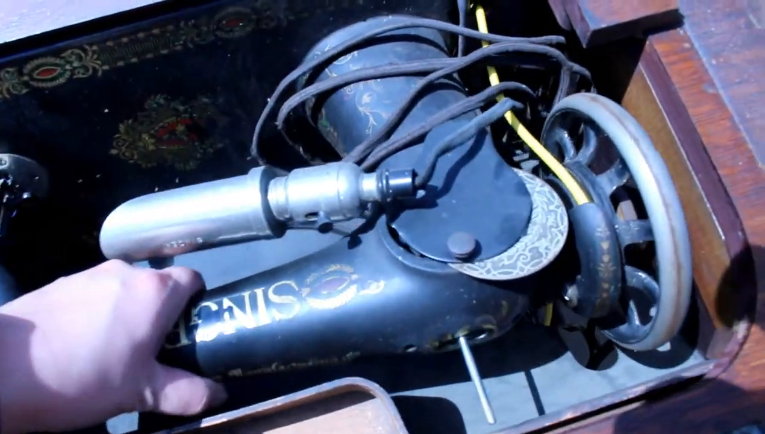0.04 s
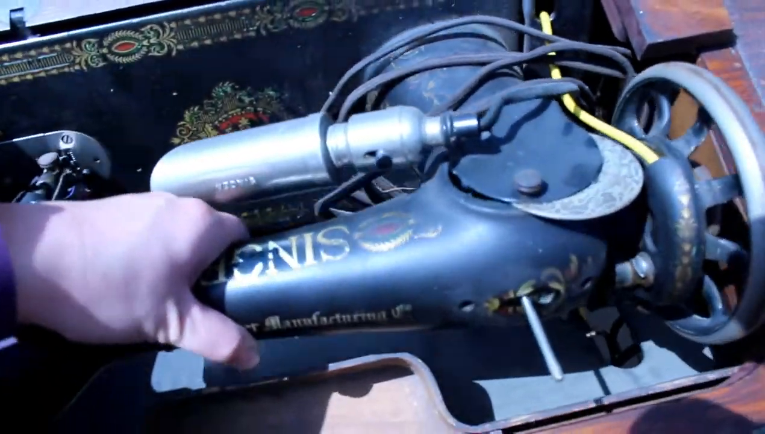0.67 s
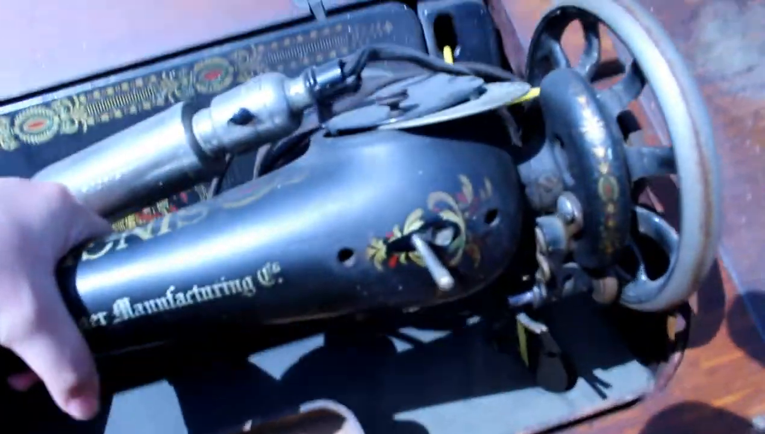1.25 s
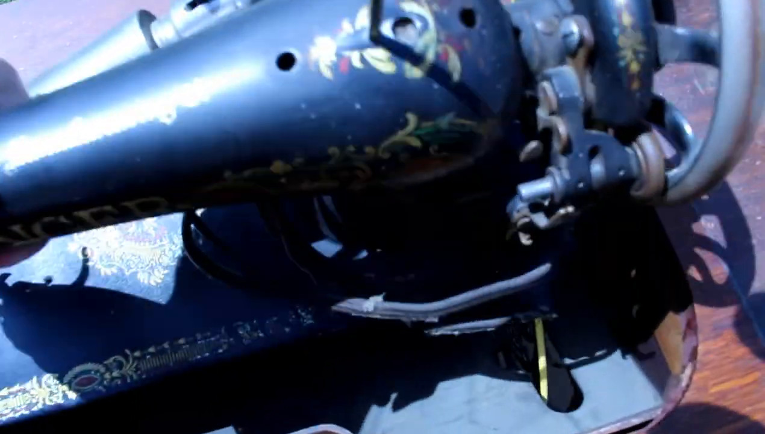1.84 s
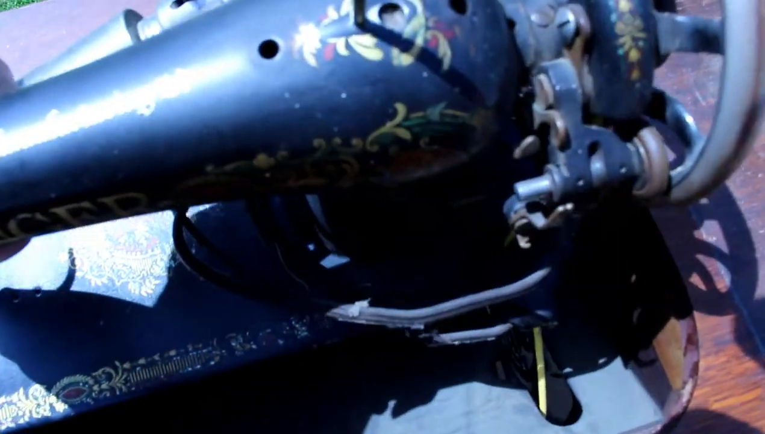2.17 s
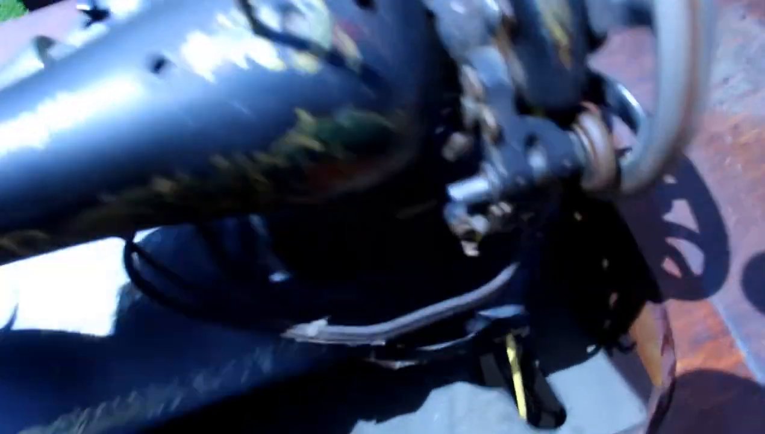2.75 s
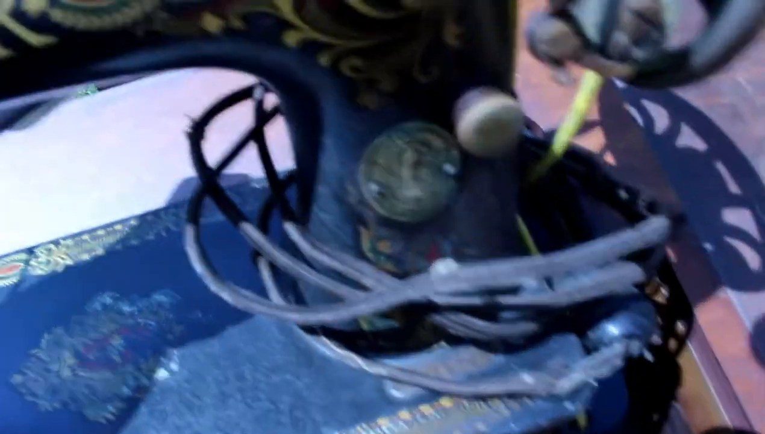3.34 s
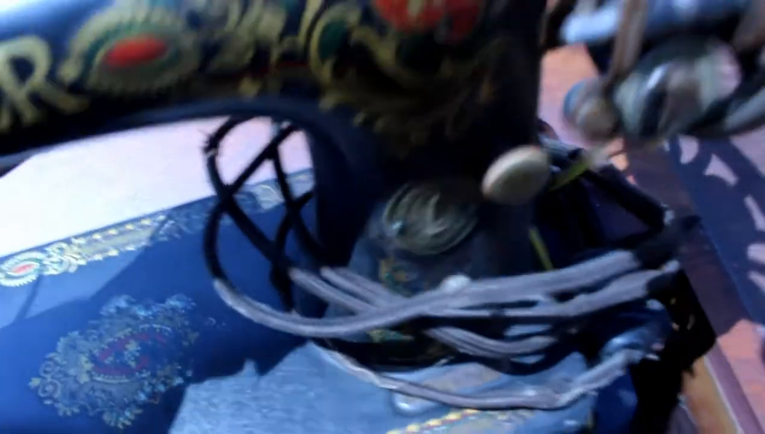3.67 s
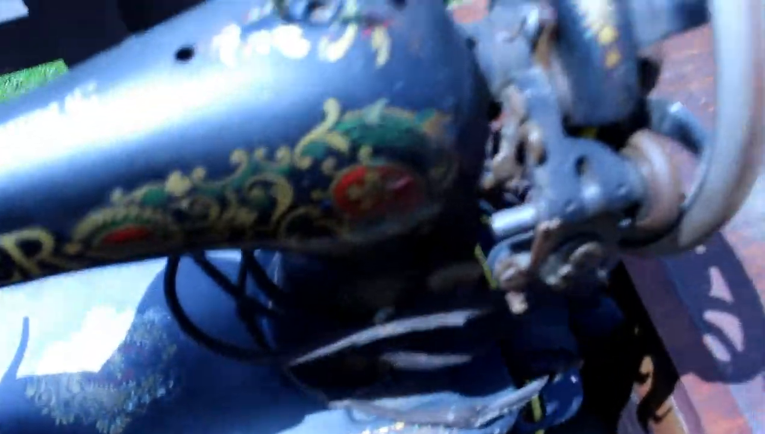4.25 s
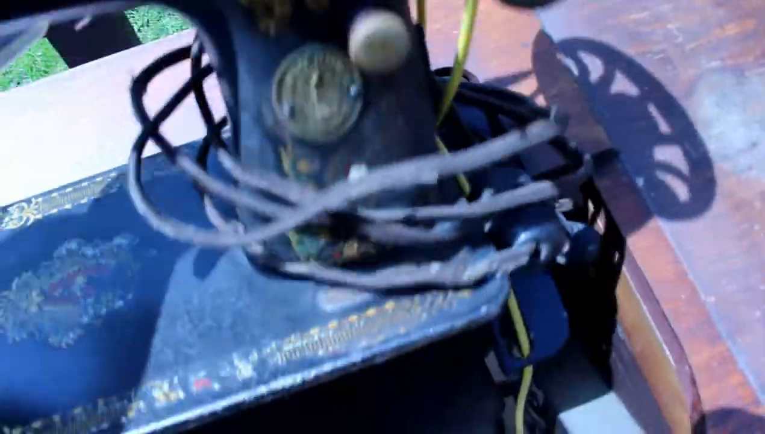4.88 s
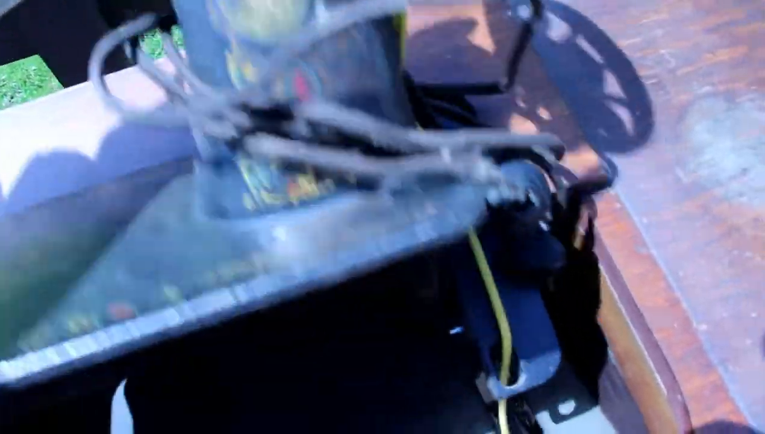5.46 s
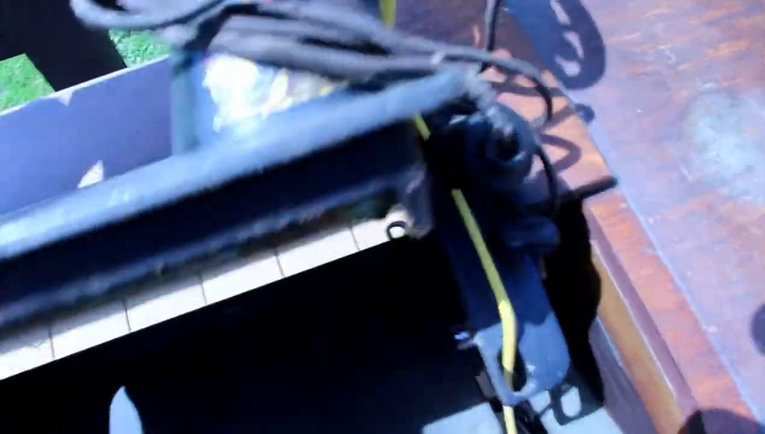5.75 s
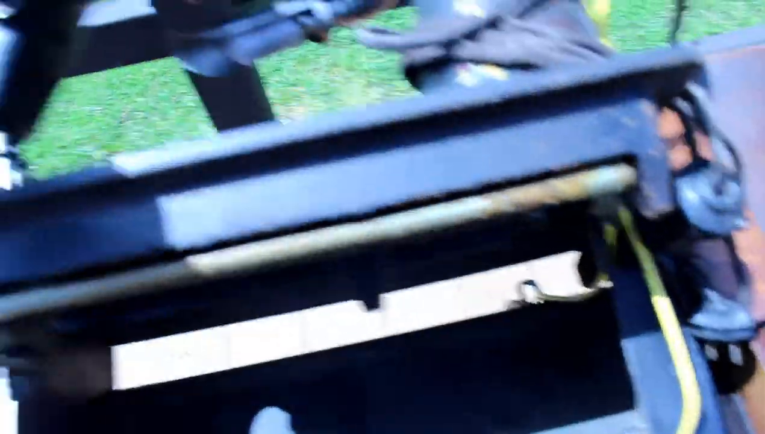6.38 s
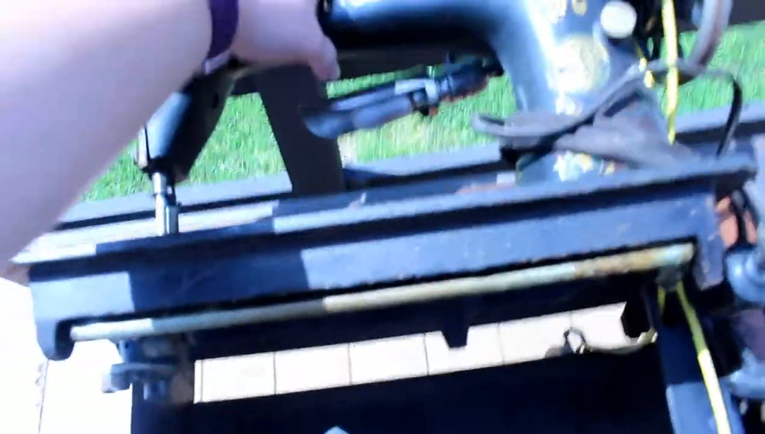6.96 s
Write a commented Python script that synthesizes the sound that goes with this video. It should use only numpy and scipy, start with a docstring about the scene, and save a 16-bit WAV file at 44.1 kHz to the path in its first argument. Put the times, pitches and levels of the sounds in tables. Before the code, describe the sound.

A heavy sewing machine head grinds and knocks against its wooden cabinet while birds chirp in a light breeze.

```python
"""Grinding, wooden knocks and small steel ticks sound close by in a garden, with a rustling sleeve,
as a cast-iron sewing machine head is swung up out of its cabinet. Stick-slip friction makes the grinding;
impacts excite the damped modes of wood and metal. One songbird repeats a few gliding syllables nearby
and others call far off, while wind eddies nudge the microphone over a low distant drone
and a far engine gathering speed."""
import sys
import numpy as np
from scipy import signal
from scipy.io import wavfile
from scipy.ndimage import uniform_filter1d

SR = 44100
rng = np.random.default_rng(int(sys.argv[2]) if len(sys.argv) > 2 else 0)


def store_pcm(level_fs):
    """Save levels as 16-bit WAV."""
    pcm = np.round(np.clip(level_fs, -1, 1) * 32767).astype(np.int16)
    wavfile.write(sys.argv[1], SR, np.atleast_2d(pcm).T)


N = 309141

# modes of the hollow cabinet: frequency_hz, level_db, t60_s
BOX_MODES = [(234.3, -16.5, 0.88), (295.7, -11.5, 0.29), (335.7, -12.5, 0.38), (366, -9.5, 0.093),
             (464, -2, 0.19), (557.7, 1, 0.17), (634, 10, 0.073), (668.1, 8.5, 0.075)]
# syllable contours that the song table draws on: offset_s, pitch_hz, level_db
THIN_WHISTLE = [(0, 9100, 2), (.04, 8680, 1)]
HIGH_WHISTLE = [(0, 6630, -0.5), (.05, 6590, 3.5)]
LOW_WHISTLE = [(0, 5000, -9.5), (0.024, 4650, 2.5), (0.065, 4500, -1.5)]
ARCH = [(0, 5360, -6), (.016, 6400, -1.5), (.032, 6030, 5.5), (.046, 4400, -9), (.056, 3430, -2)]
CHIP = [(0, 4450, -1), (0.013, 6530, 0)]
SQUEAK = [(0, 7250, -3), (.032, 7800, 1)]
SLUR = [(0, 5900, -4), (.015, 6920, -12.5), (.027, 5420, -6), (.048, 5405, 1), (.065, 4700, 2.5),
        (.083, 3380, -7)]
DIP = [(0, 7700, -12), (0.021, 6140, 2.5), (0.041, 5800, 4.5), (.068, 6660, -6)]
LOW_RISE = [(0, 3570, 2), (.025, 3970, 1.5), (.06, 3950, 0)]
HOOK = [(0, 5300, -4), (.02, 5900, -0.5), (0.053, 4950, -4.5)]
SWOOP = [(0, 4220, -7), (.04, 4950, 5), (.072, 6380, -3), (.095, 4610, -4), (.135, 3850, -1),
         (.175, 3500, -6)]
FALL = [(0, 6800, -5), (.018, 5180, 4), (.042, 4820, -3), (.056, 4600, -17), (.072, 4000, -2),
        (0.101, 3590, -9)]


def knocks():
    """Impact excitation: the brighter a blow, the more it drives the iron and the less the box."""
    # head on cabinet, bare iron bright, a flat face dull: start_s, level_db, brightness_db_per_octave
    blows = [(0.046, -32, 1), (0.087, -35.5, -3), (0.812, -61, 21), (1.194, -36, -2), (1.277, -38, 7.5),
             (2.2515, -20, 0.5), (2.2635, -25, 12.5), (2.268, -9.5, 8), (2.2705, -12, -1),
             (2.317, -28.5, 1), (2.6425, -40.5, -2.5), (2.7225, -26.5, 3.5), (2.735, -34, 7),
             (2.745, -33.5, -10), (2.787, -33.5, 4), (3.029, -24, 4), (3.149, -33, -5.5),
             (3.302, -45, -2.5), (3.69, -44, -4), (3.734, -36.5, -3.5), (3.759, -39, -4),
             (3.915, -30, -0.5), (3.9305, -25, 1.5), (3.945, -30.5, -3.5), (3.9745, -28, -0.5),
             (4.008, -32.5, -5.5), (4.032, -36.5, -10), (4.888, -41, 0), (4.928, -39.5, -3.5),
             (5.065, -39, 0), (5.174, -37.5, 2.5), (5.225, -36, -0.5), (5.259, -39.5, 2.5),
             (5.307, -34, -3.5), (5.319, -35, -6), (5.395, -34, 1), (5.427, -44.5, -8.5)]
    # the hinges judder and bump the box: start_s, level_db
    bumps = [(0.334, -38), (0.432, -36.5), (0.496, -39.5)]
    # modes of the thin panels: frequency_hz, level_db, t60_s
    panel_modes = [(777, -5, 0.2), (861, 5, 0.085), (963, 1.5, 0.093), (1080, 2.5, 0.052), (1113, 6, 0.095),
                   (1204, -3, 0.03), (1260, -4, 0.06), (1324, -0.5, 0.07), (1558, -5, .05),
                   (1610, -2, 0.04)]
    # modes of the casting: frequency_hz, level_db, t60_s
    iron_modes = [(1750, -1, 0.07), (1966, -5, 0.077), (2286, 8, 0.02), (2386, 4, 0.053), (2537, 0, 0.03),
                  (2800, -19, .04), (3350, -10, 0.018), (4030, -10.5, 0.046), (4960, -30, .03)]
    box_share_db, iron_share_db = -1, -11
    box_octaves, iron_octaves = -.8, 1.3  # distance in pitch from the panels
    panel_limit_db = -20.5  # the panels give way under a heavy blow and get no louder
    out = np.zeros((2, N))
    for s, db, brightness in blows:
        add(out, s, from_db(db + box_share_db + brightness * box_octaves) * box_blow())
        panels = strike(panel_modes, crack_db=2, crack_t60=0.041, tail_db=-10.5, tail_t60=0.22,
                        alike=0.86)
        add(out, s, from_db(min(db, panel_limit_db)) * panels)
        iron = strike(iron_modes, crack_db=4.5, crack_t60=0.041, tail_db=-28.5, tail_t60=0.41,
                      alike=0.72)
        add(out, s, from_db(db + iron_share_db + brightness * iron_octaves) * iron)
    for s, db in bumps:
        add(out, s, from_db(db) * box_blow())
    return out


def box_blow():
    """Impulse response: the hollow cabinet rings after one blow."""
    return strike(BOX_MODES, crack_db=0, crack_t60=0.02, tail_db=-15.5, tail_t60=0.22, alike=0.87)


def ticks():
    """Free vibration: light steel parts touch and ring briefly in high modes."""
    # contacts: start_s, level_db
    touches = [(0.114, -52), (2.268, -24), (2.33, -52), (2.7354, -31.5), (2.743, -39), (2.755, -46),
               (3.03, -46.5), (3.931, -52), (4.821, -52)]
    # modes of the steel parts: frequency_hz, level_db, t60_s
    steel_modes = [(5520, 4, 0.061), (5720, 4, .04), (6730, 4, 0.03), (7760, -20, 0.0067), (8900, 5, 0.03),
                   (10400, -10, .02), (13200, -8, .012)]
    out = np.zeros((2, N))
    for s, db in touches:
        tick = strike(steel_modes, crack_db=0.5, crack_t60=0.016, tail_db=-22, tail_t60=0.13,
                      alike=0.071)
        add(out, s, from_db(db) * tick)
    return out


def strike(modes, crack_db, crack_t60, tail_db, tail_t60, alike):
    """Modal superposition: damped sines over a noisy crack and diffuse tail; rms one at the attack."""
    t = np.arange(SR // 3) / SR
    hz, db, t60 = np.array(modes).T[:, :, None]
    attack = slice(SR // 110)
    strengths = from_db(db + rng.normal(0, 4.3, db.shape)) * rng.choice([-1, 1], db.shape)
    ring = np.sum(strengths * np.sin(2 * np.pi * hz * t) * from_db(-60 * t / t60), axis=0)
    fade = from_db(-60 * t / crack_t60) + from_db(tail_db - 60 * t / tail_t60)
    crack = coloured(rng.standard_normal((2, 2, len(t))) * fade, modes, [(1000, alike)])
    blow = ring / ring[attack].std() + from_db(crack_db) * crack / crack[:, attack].std()
    return blow / blow[:, attack].std()


def handling():
    """Sliding friction: the heavy head grinds, slides and groans while hand and sleeve rub over it."""
    # effort of the first long lift: time_s, level_db
    lift = [(0.0, -35), (0.1, -39.5), (0.31, -48.5), (0.32, -45), (1.35, -38), (1.98, -57), (2.2, -84)]
    # the head drags on the wood: start_s, length_s, level_db
    drags = [(2.7, .16, -41), (2.92, 0.4, -44), (4.8, 0.87, -53)]
    # the hinges groan under the weight: start_s, length_s, level_db
    groans = [(3.71, 0.033, -43.5), (3.94, 0.14, -37.5), (5.15, 0.33, -42)]
    # dry slides of the machine's bed: start_s, length_s, level_db
    slides = [(0, 0.2, -41), (1.40, 0.12, -44), (1.68, 0.055, -45), (2.93, 0.094, -45), (3.16, 0.032, -44),
              (3.30, 0.0072, -63)]
    # hand and sleeve: start_s, length_s, level_db
    rubs = [(0, 0.16, -57), (5.15, 0.92, -56.5), (5.95, 0.36, -52.5)]
    # spectrum of each contact: frequency_hz, density_db
    grind_colour = [(150, -11.5), (220, -5), (300, 4.5), (420, -3), (640, -20.5), (800, -5.5), (1100, -5),
                    (1600, -22), (3000, -60)]
    groan_colour = [(195, -4), (235, 9), (320, -35), (470, -13), (660, 5), (900, 8.5), (1300, -29)]
    slide_colour = [(450, 8), (750, 10.5), (1100, 1), (1650, 7.5), (2200, 0), (4200, -2), (6000, -15),
                    (9500, -10.5), (13000, -36)]
    rub_colour = [(1500, 8), (3500, 4.5), (6500, -0.5), (9000, 1.5), (12000, -25), (15000, -13)]
    effort = gain_curve(lift) * from_db(2) + strokes(drags)
    slips = friction(grind_colour, slips_per_s=700, spread_db=2.0, alike=0.55)
    grind = effort * through_box(slips, ring_db=4.0)
    groan = strokes(groans) * friction(groan_colour, slips_per_s=580, spread_db=-3.5, alike=0.65)
    slide = strokes(slides) * friction(slide_colour, slips_per_s=3000, spread_db=3.0, alike=0.89)
    rub = strokes(rubs) * friction(rub_colour, slips_per_s=4400, spread_db=-2.5, alike=0.55)
    return grind + slide + groan + rub


def friction(colour, slips_per_s, spread_db, alike):
    """Stick-slip: tiny slips of uneven size excite a body at random times."""
    sizes = from_db(spread_db * np.minimum(rng.exponential(1, N), 4))
    slipping = rng.random(N) < slips_per_s / SR
    impulses = sizes * slipping * rng.standard_normal((2, 2, N)) + 1e-18
    return evened(coloured(impulses, colour, [(1000, alike)]), span_s=0.126)


def through_box(x, ring_db):
    """Forced resonance: rubbing keeps the box ringing, which rounds each slip into a soft bump."""
    t = np.arange(SR // 4) / SR
    hz, db, t60 = np.array(BOX_MODES).T[:, :, None]
    response = np.sum(from_db(db) * np.sin(2 * np.pi * hz * t) * from_db(-60 * t / t60), axis=0)
    ring = rms_one(signal.fftconvolve(x, response[None], axes=1)[:, :N])
    return evened(x + from_db(ring_db) * ring, span_s=0.127)


def near_bird(clear_waver, hoarse_waver):
    """Frequency modulation: whistled syllables glide, and a deepening flutter turns them hoarse."""
    # the song: start_s, syllable, level_db
    song = [(0.258, THIN_WHISTLE, -55), (1.21, HIGH_WHISTLE, -62.5), (3.324, HOOK, -59),
            (3.385, LOW_WHISTLE, -49), (3.544, CHIP, -48.5), (3.598, HIGH_WHISTLE, -49.5),
            (3.742, LOW_WHISTLE, -35.5), (3.813, ARCH, -39.5), (3.99, CHIP, -39), (4.032, SQUEAK, -48),
            (4.111, CHIP, -41), (4.15, SQUEAK, -55), (4.229, SLUR, -38.5), (4.357, SLUR, -38.5),
            (4.484, SLUR, -41), (4.643, DIP, -45.5), (4.718, LOW_RISE, -45), (4.781, HOOK, -40),
            (4.953, SWOOP, -43.5), (5.235, HIGH_WHISTLE, -54), (5.281, FALL, -42), (5.385, LOW_RISE, -49),
            (5.5, HIGH_WHISTLE, -56), (5.541, FALL, -44)]
    fade_s = 0.0024
    out, flutter = np.zeros(N), drift(rate_hz=300)
    for s, syllable, db in song:
        times, pitches, levels = np.transpose(syllable)
        t = np.arange(0, times[-1], 1 / SR)
        fade = np.minimum(1, np.minimum(t, t[-1] - t) / fade_s)
        envelope = from_db(db + np.interp(t, times, levels)) * fade
        waver = np.interp(s, [4.2, 5.0], [clear_waver, hoarse_waver])
        hz = np.interp(t, times, pitches) * (1 + waver * flutter[int(s * SR):][:len(t)])
        add(out, s, envelope * tone(hz))
    return out


def far_birds():
    """Modulation depth: a slight warble is heard as a plain whistle, a deep one as a trill."""
    # level or sliding whistles: start_s, length_s, start_hz, end_hz, level_db
    whistles = [(0, 0.051, 2800, 2610, -52), (.09, .17, 2770, 2408, -55.5), (.16, 0.15, 3790, 3670, -60.5),
                (.55, 0.12, 2666, 2580, -54.5), (.79, 0.095, 2590, 2690, -54), (.92, 0.11, 2610, 2654, -62),
                (1.83, .09, 2605, 2750, -60), (1.97, .1, 2860, 2615, -58), (3.4, .12, 3950, 3230, -59.5),
                (4.425, 0.068, 2925, 2610, -58), (4.56, 0.22, 2663, 2560, -57),
                (5.155, 0.067, 3046, 3250, -52)]
    # trills: start_s, length_s, pitch_hz, level_db
    trills = [(0.465, 0.14, 2985, -58.5), (1.91, .1, 3000, -59.5), (2.365, .33, 2936, -60.5),
              (2.899, 0.148, 2640, -59), (3.05, .1, 3086, -56), (4.038, 0.18, 3060, -57.5),
              (5.85, 0.4, 2410, -63.5)]
    sag = .08  # share of its pitch that a trill sinks
    sinking = [(s, length, hz * (1 + sag / 2), hz * (1 - sag / 2), db) for s, length, hz, db in trills]
    return far_calls(whistles, warble=.01) + far_calls(sinking, warble=.08)


def far_calls(rows, warble):
    """Random frequency modulation: notes warble fast around a linear glide."""
    out, wobble = np.zeros(N), drift(rate_hz=169)
    for s, length, start_hz, end_hz, db in rows:
        envelope = swell(length)
        glide_hz = np.linspace(start_hz, end_hz, len(envelope))
        hz = glide_hz * (1 + warble * wobble[int(s * SR):][:len(envelope)])
        add(out, s, from_db(db) * envelope * tone(hz))
    return out


def wind():
    """Turbulence: eddies on the microphone rumble with the breeze; a soft handling bump comes first."""
    # strength of the breeze: time_s, level_db
    breeze_levels = [(0.0, -60), (0.82, -61), (1.02, -57.5), (2.6, -56), (3.2, -48), (5.9, -49),
                     (6.09, -48), (7.01, -51.5)]
    # a soft low handling bump at the start, then puffs of wind: start_s, length_s, rumble_db, edge_db
    nudges = [(0.01, 0.15, -58, -42.5), (4.793, 0.06, -36.5, -44), (5.009, 0.067, -35, -43),
              (5.916, 0.35, -45, -37.5), (6.115, 0.049, -29.5, -36), (6.357, 0.063, -45, -54),
              (6.55, 0.17, -42, -48)]
    # spectra of the eddies and their upper edge: frequency_hz, density_db
    rumble_colour = [(15, -5.5), (30, -7.5), (45, -6.5), (70, -21), (140, -58)]
    edge_colour = [(50, 2), (85, -3.5), (115, -1.5), (160, -9.5), (260, -19.5), (600, -36)]
    breeze = gain_curve(breeze_levels)
    rumble_gain = breeze * from_db(7) + strokes([(s, length, db) for s, length, db, _ in nudges])
    edge_gain = from_db(-53.5) * (breeze / breeze.mean()) ** 0.13  # follows the breeze only weakly
    edge_gain += strokes([(s, length, db) for s, length, _, db in nudges])
    rumble = rumble_gain * evened(air_noise(rumble_colour), span_s=0.06)
    edge = edge_gain * evened(air_noise(edge_colour), span_s=0.25)
    return rumble + edge * from_db([[-1.3], [1.3]])


def distant_motors():
    """Periodic sources: a low drone wanders in pitch; an engine's note climbs with its speed."""
    # rise and fall of the drone: time_s, level_db
    drone_levels = [(0.0, -47), (0.49, -56), (0.84, -60), (1.48, -51), (2.6, -63), (3.18, -43), (3.98, -57),
                    (4.53, -47.5), (5.48, -55.5), (5.92, -47), (6.83, -50.5), (7.01, -58)]
    # the accelerating engine: start_s, length_s, start_hz, end_hz, level_db
    engine = (2.0, 1.5, 87.5, 109, -55.5)
    drone_hz = 60.8 + 3.08 * drift(rate_hz=3.87)
    ear_offset_cycles = 0.13 * np.array([drift(rate_hz=6.0), drift(rate_hz=6.6)])
    cycles = np.cumsum(drone_hz) / SR + ear_offset_cycles
    drone_gain = gain_curve(drone_levels) * from_db(6.5 + 5.1 * drift(rate_hz=5.3))
    out = drone_gain * np.sin(2 * np.pi * cycles)
    s, length, start_hz, end_hz, db = engine
    envelope = swell(length)
    add(out, s, from_db(db) * envelope * tone(np.linspace(start_hz, end_hz, len(envelope))))
    return out


def garden_hush():
    """Ambient noise: a steady broadband floor lies under everything."""
    # spectrum of the garden: frequency_hz, density_db
    hush_colour = [(53, -43), (90, -0.5), (151, -13), (342, -5.5), (515, -9), (1000, -7.5), (1920, -17.5),
                   (2650, -13.5), (3220, -16.5), (4740, -19.5), (7290, -26), (14500, -27.5), (15500, -34)]
    return from_db(-48) * air_noise(hush_colour)


def air_noise(colour):
    """Diffuse field: noise from all round is only partly correlated between the ears."""
    # left-right likeness of the open air: frequency_hz, correlation
    likeness = [(30, 0.29), (120, -0.26), (300, 0.21), (1000, 0.52), (2500, 0.57), (5000, 0.26),
                (12000, -0.097)]
    return coloured(rng.standard_normal((2, 2, N)), colour, likeness)


def outdoors(x, t60, wet_db, direct_db):
    """Scattering: trees and walls give a call a diffuse tail, different at each ear."""
    t = np.arange(SR) / SR
    scatter = rng.standard_normal((2, SR)) * from_db(-60 * t / t60) * (1 - np.exp(-t / 0.0021))
    scatter /= np.sqrt(np.sum(scatter ** 2, axis=1, keepdims=True))
    tail = signal.fftconvolve(x[None], scatter, axes=1)[:, :N]
    return from_db(direct_db) * x + from_db(wet_db) * tail


def from_the_right(x, delay_samples):
    """Interaural delay: sound from the right reaches the left ear late."""
    return np.array([np.pad(x[0], (delay_samples, 0))[:N], x[1]])


def coloured(sources, colour, likeness):
    """Spectral shaping: half-octave bands drawn in turn from two mid-side pairs; stereo, rms one."""
    lowest, highest = colour[0][0], colour[-1][0]
    edges = np.geomspace(lowest, highest, int(2 * np.log2(highest / lowest)) + 2)
    out = 0
    for k, (low, high) in enumerate(zip(edges, edges[1:])):
        mid, side = band(sources[k % 2], low, high)
        hz = np.sqrt(low * high)
        alike = np.clip(at_hz(likeness, hz), -1, 1)
        stereo = np.sqrt(1 + alike) * mid + np.sqrt(1 - alike) * side * [[1], [-1]]
        out = out + from_db(at_hz(colour, hz)) * stereo
    return rms_one(out)


def band(x, low_hz, high_hz):
    """Causal band-pass filtering."""
    edges = [low_hz, min(high_hz, SR / 2 - 500)]
    return signal.sosfilt(signal.butter(2, edges, "band", fs=SR, output="sos"), x)


def at_hz(points, hz):
    """Interpolation on a log-frequency axis."""
    return np.interp(np.log(hz), np.log(np.array(points)[:, 0]), np.array(points)[:, 1])


def tone(hz):
    """A sine whose phase is the integral of its frequency."""
    return np.sin(2 * np.pi * np.cumsum(hz) / SR)


def drift(rate_hz):
    """Low-passed noise: a smooth random wander with a spread of one."""
    hop = 40
    pole = np.exp(-2 * np.pi * hop * rate_hz / SR)
    noise = rng.standard_normal(N // hop + 2002)
    slow = signal.lfilter([1], [1, -2 * pole, pole * pole], noise)[2000:]
    return np.interp(np.arange(N) / hop, np.arange(len(slow)), rms_one(slow))


def swell(length_s):
    """A rounded envelope with an rms of one."""
    angle = np.linspace(0, np.pi, max(8, int(length_s * SR)))
    return np.sqrt(np.pi / 2 * np.abs(np.sin(angle)))


def strokes(rows):
    """The summed envelopes of a few short movements."""
    gain = np.zeros(N)
    for s, length, db in rows:
        add(gain, s, from_db(db) * swell(length))
    return gain


def gain_curve(rows):
    """Interpolation in decibels, giving a gain per sample."""
    times, levels = np.transpose(rows)
    return from_db(np.interp(np.arange(N) / SR, times, levels))


def evened(x, span_s):
    """Division by the running rms steadies the level and leaves the finer grain."""
    power = uniform_filter1d(np.mean(x ** 2, axis=0), max(2, int(span_s * SR)))
    return x / np.sqrt(power + 1e-6)


def rms_one(x):
    """Normalisation to an rms of one."""
    return x / np.sqrt(np.mean(x ** 2) + 1e-20)


def from_db(db):
    """Decibels to amplitude ratio."""
    return 10 ** (np.asarray(db) / 20)


def add(out, start_s, sound):
    """Superposition of a sound at a given time."""
    i = max(0, round(start_s * SR))
    out[..., i:i + sound.shape[-1]] += sound[..., :N - i]


def scene():
    """Binaural cues set the cabinet close in front and a little to the right, with birds around it."""
    song = near_bird(clear_waver=.005, hoarse_waver=0.05)
    near = outdoors(song, t60=0.38, wet_db=0.0, direct_db=1.0)
    far = outdoors(far_birds(), t60=0.99, wet_db=7.0, direct_db=7.0)
    cabinet = (knocks() + ticks()) * from_db([[-.4], [.4]]) + handling() * from_db([[-2.2], [1.6]])
    background = (wind() + garden_hush() + distant_motors()) * from_db([[-.5], [.5]])
    return from_the_right(cabinet + near, delay_samples=1) + far + background


def record(dry):
    """Soft saturation rounds the loudest knock; a steep low-pass cuts the top."""
    ceiling, cutoff_hz = 1.1, 15800
    low_pass = signal.ellip(10, .1, 80, cutoff_hz, fs=SR, output="sos")
    return signal.sosfilt(low_pass, ceiling * np.tanh(dry / ceiling))


dry = scene()
out = record(dry)
store_pcm(out)
```